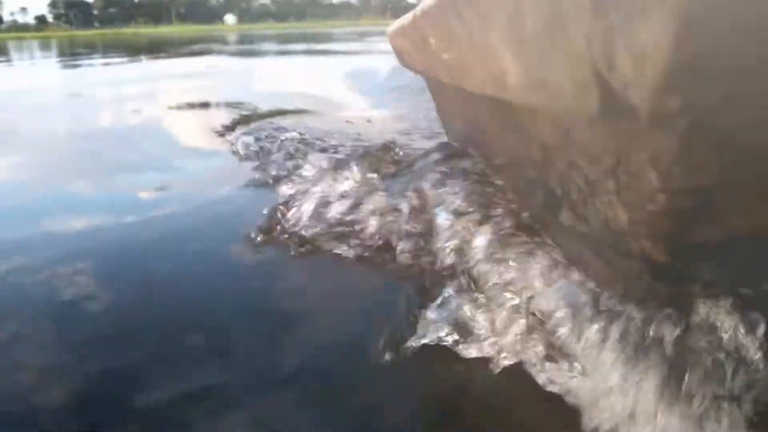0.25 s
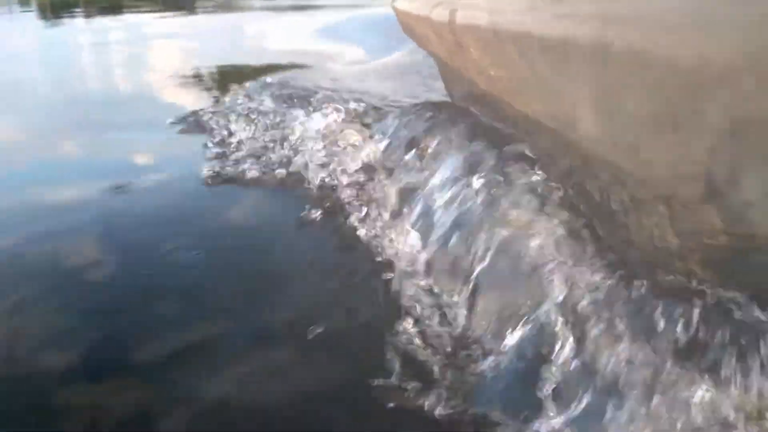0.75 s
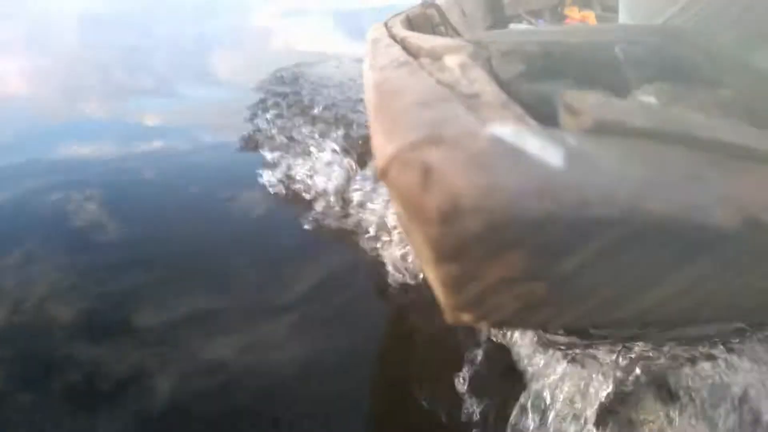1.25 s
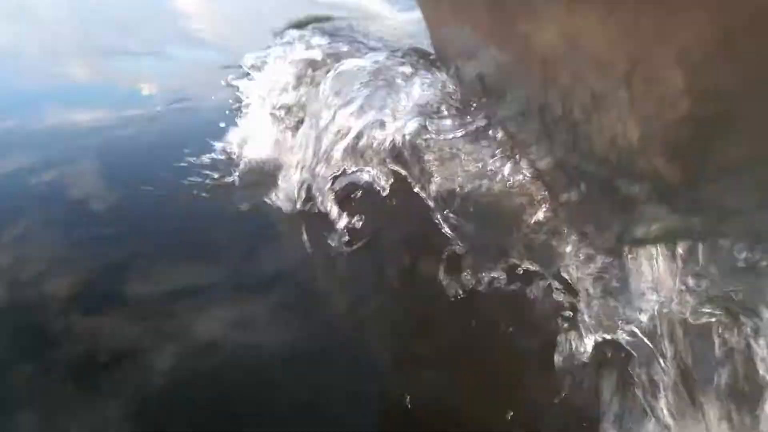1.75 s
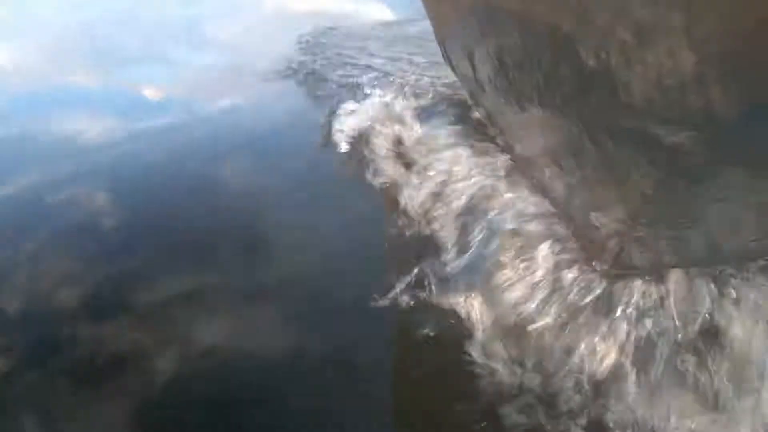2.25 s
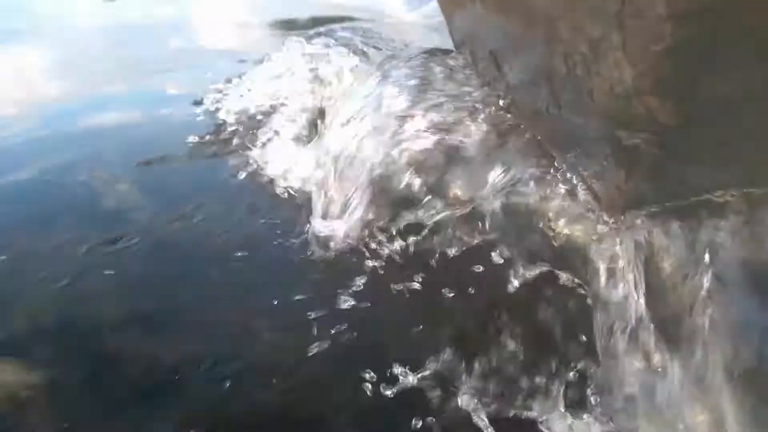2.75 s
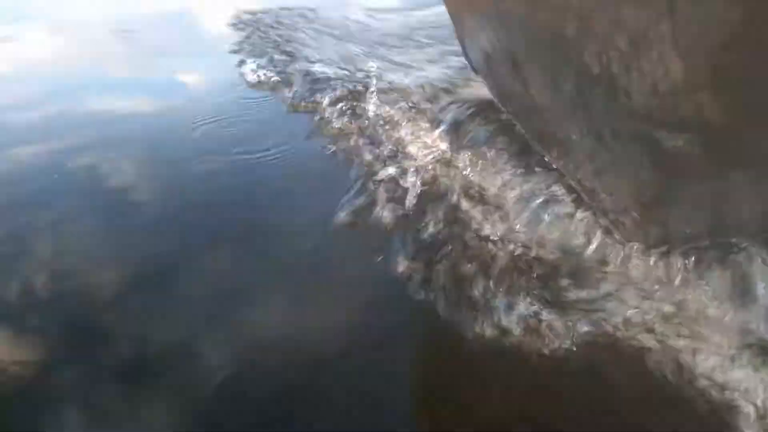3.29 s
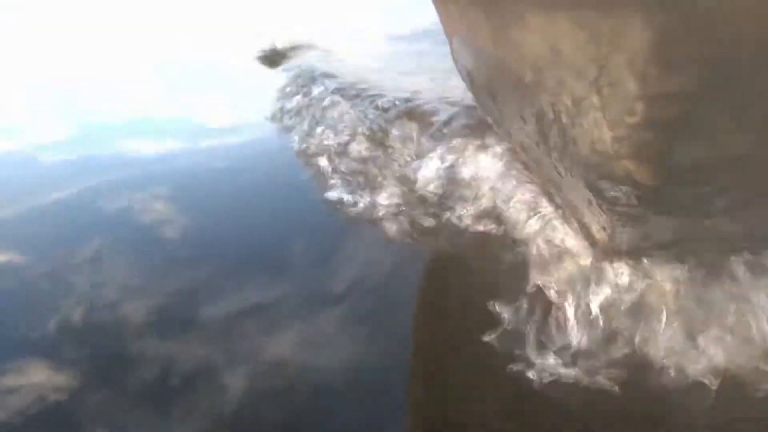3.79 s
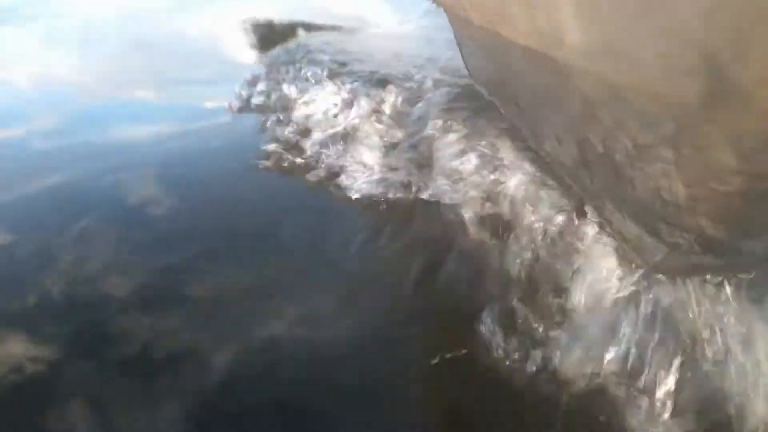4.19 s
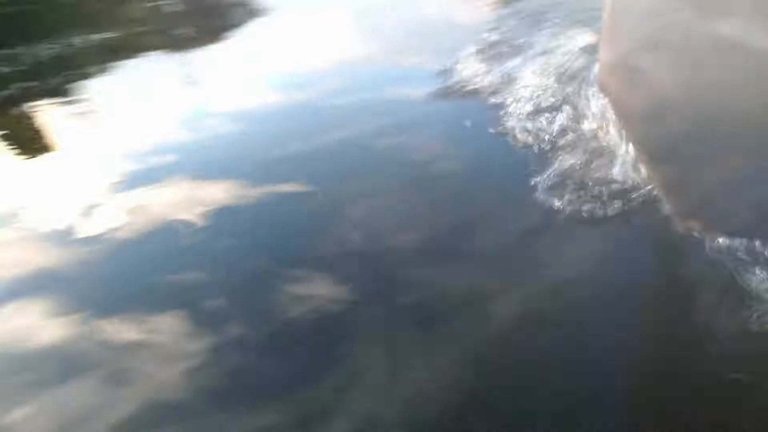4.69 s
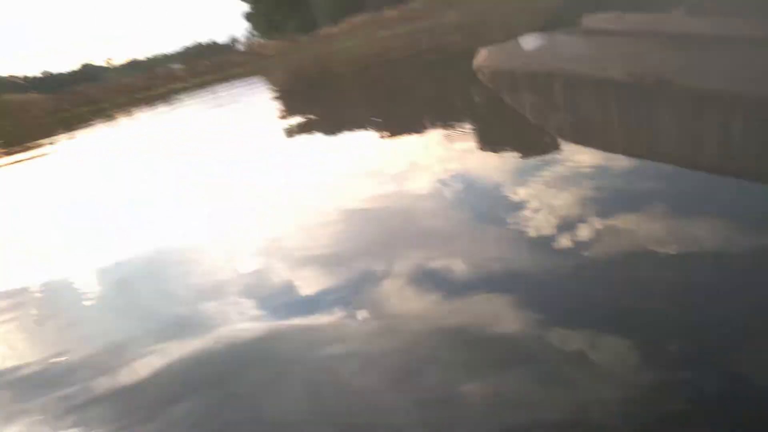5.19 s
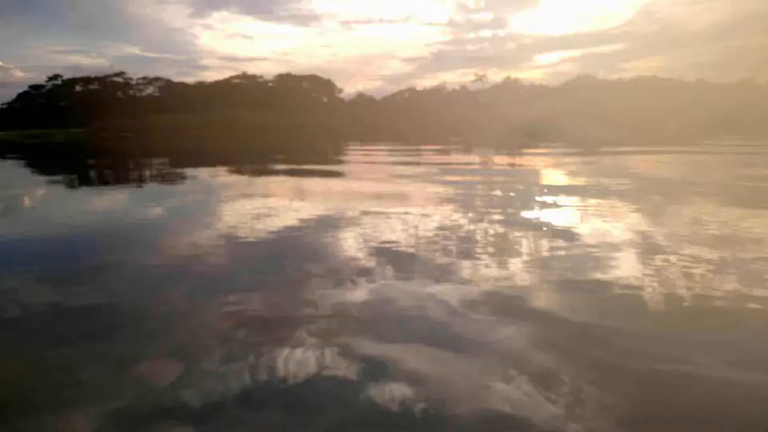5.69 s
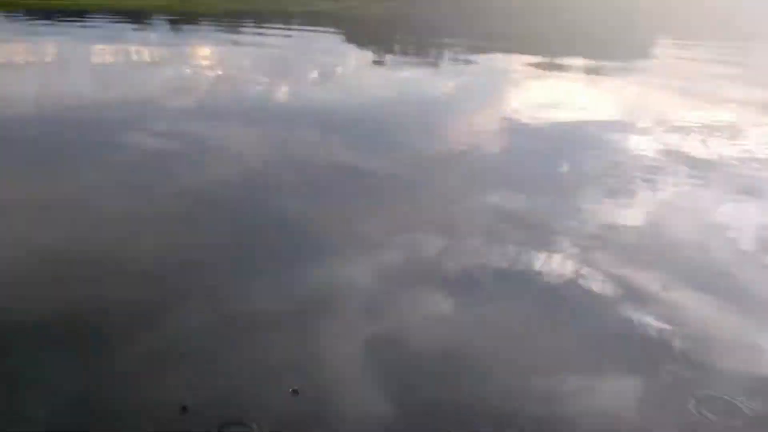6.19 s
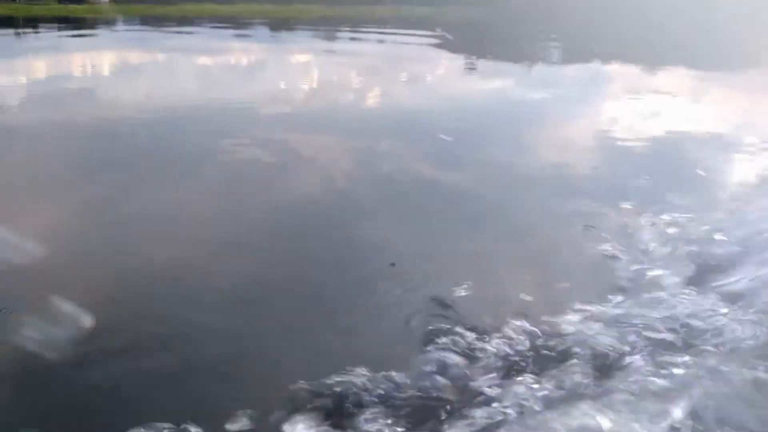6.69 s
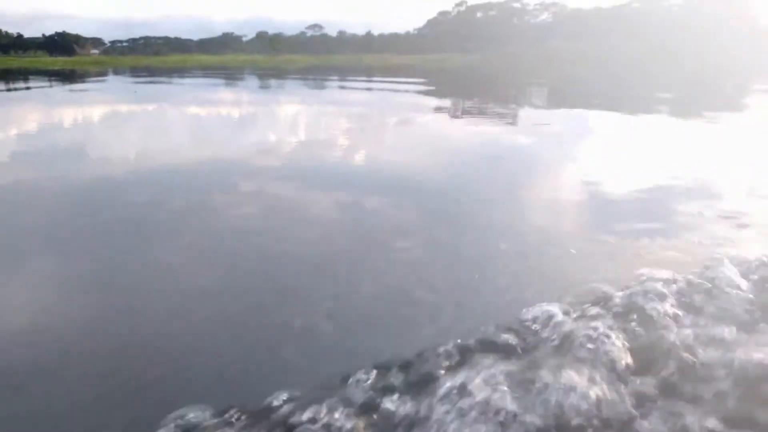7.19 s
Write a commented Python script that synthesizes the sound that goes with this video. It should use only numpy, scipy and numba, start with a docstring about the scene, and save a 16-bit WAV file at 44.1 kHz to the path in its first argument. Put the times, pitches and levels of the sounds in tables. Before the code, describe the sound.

Water gurgles, gulps and splashes in uneven surges beside a small moving boat, then bursts into loud crackling spray with low wind buffeting close up.

```python
"""Beside the hull of a small moving boat, its bow wave breaks in uneven surges close to a hand-held phone.
Trapped air rings as bubbles, decaying sines: big pockets gurgle and gulp, smaller ones plop and fizz.
Spray crackles on top as coloured impacts, noise and microbubbles; near drops click as bursts of noise.
Gusts of the boat's own wind, made of low coloured noise and single thumps, buffet the two microphone ports."""
import sys
import numpy as np
from scipy import signal
from scipy.fft import rfft, irfft, next_fast_len
from scipy.io import wavfile
from scipy.ndimage import uniform_filter1d, minimum_filter1d
from numba import njit

SR = 44100
rng = np.random.default_rng(int(sys.argv[2]) if len(sys.argv) > 2 else 0)


def waveform_to_disk(signal):
    """Save audio, clipped to [-1, 1], as 16-bit WAV at the path in sys.argv[1]."""
    frames = np.transpose(np.atleast_2d(signal))
    scaled = np.clip(frames, -1, 1) * 32767
    samples = np.round(scaled).astype(np.int16)
    wavfile.write(sys.argv[1], SR, samples)


N = 328532

# ring of the foam: (time [s], central bubble pitch [Hz], treble gain [dB])
FOAM_RING = [(0.0, 2313, -2), (0.5, 2380, -10.5), (0.9, 2103, -2), (1.5, 1904, 0.5), (2.1, 1441, 9.5),
             (2.6, 1594, 12), (2.9, 1406, 9.5), (3.45, 1610, 16.5), (3.6, 2516, -5), (4.0, 2398, -5),
             (4.3, 2295, -6), (4.8, 1956, -7), (5.2, 1810, -15), (5.6, 1945, -5), (5.9, 1795, 1),
             (6.2, 1905, -15), (6.5, 1520, -2), (6.65, 1610, 10), (6.85, 1801, -2), (7.05, 1903, 6.5),
             (7.45, 1817, -11)]

SLOPE_DB = 23  # a rise or fade time covers this many dB
# factors on the surges' rise and fade times, which the spray takes unchanged
FOAM_RISE, FOAM_FADE = 1.73, 1.32
MIST_RISE, MIST_FADE = 1.64, 0.88
GURGLE_RISE, GURGLE_FADE = 1.2, 0.76
# the hull ripples on between surges: levels ahead of each layer's trim
RIPPLE_SPRAY_DB, RIPPLE_MIST_DB, RIPPLE_FOAM_DB, RIPPLE_GURGLE_DB = -42.5, -74, -57.5, -72
PING_HZ, PING_DRIFT = 9015, 0.052  # usual pitch of the spray's microbubbles; random drift [octaves]
CURL_RISE_S, CURL_FADE_S = 0.045, 0.068
PLOP_DB, PLOP_GROWTH, PLOP_HZ = -25.5, 0.56, 812  # plops outside curls; growth in dB per dB of foam
GUST_RISE_S, GUST_FADE_S, BREEZE_DB = 0.11, 0.27, -53  # the breeze blows on between gusts
FOAM_TREBLE_HZ = 2960  # where the foam's treble begins
BLEND_ABOVE_HZ = 4450  # below this the ports' spray stays separate
TOP_HZ = 15600  # upper edge of the phone's passband


def undb(db):
    """Logarithmic level: decibels to amplitude gain."""
    return 10 ** (np.asarray(db) / 20)


def curve(table, axis=1):
    """Linear interpolation of one column of a table at every sample."""
    rows = np.array(table)
    return np.interp(np.arange(N) / SR, rows[:, 0], rows[:, axis])


def pan(db):
    """Level difference between the ports: left and right gains whose mean is 1."""
    gains = undb(np.array([db, -db]) / 2)
    return gains / gains.mean(axis=0)


def colour(x, points):
    """Minimum-phase filter: the folded cepstrum of the (Hz, dB) outline gives a causal response."""
    size = next_fast_len(x.shape[-1] + 8192, True) * 2
    hz, db = np.transpose(points)
    freqs = np.maximum(np.fft.rfftfreq(size, 1 / SR), 1)
    outline_db = np.interp(np.log(freqs), np.log(hz), db)
    cepstrum = irfft(np.log(undb(outline_db)))
    cepstrum[1:size // 2] *= 2
    cepstrum[size // 2 + 1:] = 0
    response = np.exp(rfft(cepstrum))
    return irfft(rfft(x, size) * response)[..., :x.shape[-1]]


def steady(x, span_s):
    """Power normalisation: the mean of the ports is levelled over each span; faster grain is kept."""
    power = x.mean(axis=0) ** 2
    width = max(int(span_s * SR), 1)
    slow = uniform_filter1d(uniform_filter1d(power, width), width)
    return x / np.sqrt(np.abs(slow) + power.mean() / 1000)


def walk(rate):
    """Band-limited fluctuation: random levels held 1 / rate s and slewed, of unit standard deviation."""
    hold = max(int(SR / rate), 1)
    levels = rng.standard_normal(8192)
    steps = levels[np.arange(N) // hold % len(levels)]
    x = uniform_filter1d(steps, hold)
    return x / x.std()


def swell(start, rise_s, hold_s, fade_s):
    """Exponential growth and decay: gain that rises to 1 at the start, holds, then dies away."""
    t = np.arange(N) / SR - start
    before = np.maximum(-t, 0) / max(rise_s, .01)
    after = np.maximum(t - hold_s, 0) / max(fade_s, .01)
    return undb(-SLOPE_DB * np.minimum(before + after, 10))


def surging(axis, base_db, rise=1, fade=1):
    """Incoherent sum: the surges' powers add; side and pocket pitch are power-weighted means."""
    # each breaking of the bow wave: (time at full strength [s], rise [s], hold [s], fade [s],
    # spray level [dB], mist level [dB], foam level [dB], gurgle level [dB],
    # spray left minus right [dB], pitch of trapped air pockets [Hz]); levels precede each layer's trim
    breakings = [(0.0, 0.094, 0.0081, 0.42, -33, -43.5, -35, -32, 2, 330),
                 (0.295, 0.12, 0.086, 0.12, -35, -42.5, -32, -38.5, 6, 373),
                 (0.437, 0.066, 0.14, 0.24, -20.5, -33, -28.5, -27, 7, 334),
                 (0.775, 0.016, 0.063, 0.37, -33, -67, -42, -31, -0.5, 434),
                 (1.177, 0.35, 0.22, 0.42, -35.5, -49, -40, -38, -1, 403),
                 (1.434, 0.11, 0.011, 0.065, -24, -51, -43, -26, 4, 363),
                 (1.577, 0.24, 0.24, 0.42, -17, -47, -35, -23, 6, 330),
                 (1.873, 0.032, 0.0079, 0.4, -26, -54, -28, -18, -22, 372),
                 (2.27, 0.12, 0.093, 0.64, -26.5, -63, -43.5, -25.5, 4, 326),
                 (2.52, 0.13, 0.23, 0.25, -28, -40.5, -39, -29, 0.5, 306),
                 (2.908, 0.22, 0.055, 0.17, -26, -41, -33.5, -32, 1.5, 378),
                 (3.073, 0.22, 0.11, 0.47, -33, -59, -44.5, -39, 0, 337),
                 (3.63, 0.074, 0.014, 0.29, -36, -64, -39.5, -65, 9, 460),
                 (3.892, 0.16, 0.071, 0.15, -22.5, -54, -32.5, -32.5, 7, 412),
                 (4.028, 0.12, 0.13, 0.34, -23.5, -37, -32, -30.5, 1.5, 471),
                 (4.248, 0.026, 0.064, 0.085, -38, -50, -35.5, -38, 10, 452),
                 (4.365, 0.07, 0.2, 0.058, -27.5, -45, -36.5, -32.5, 1.5, 436),
                 (4.589, 0.18, 0.068, 0.072, -37, -37, -32.5, -29.5, 2, 419),
                 (4.665, 0.025, 0.25, 0.34, -23, -53, -28.5, -31, 13.5, 448),
                 (5.086, 0.2, 0.19, .2, -28, -41.5, -56, -32, 19, 380),
                 (5.322, 0.049, 0.16, 0.21, -19.5, -62, -31, -28.5, 20, 376),
                 (5.454, 0.1, 0.21, 0.5, -14.5, -23, -26.5, -24, 3.5, 292),
                 (5.738, 0.2, 0.18, 0.2, -8.5, -24, -17, -26, -2, 268),
                 (5.955, 0.19, 0.21, 0.22, -11, -22, -23, -26, 1, 273),
                 (6.299, 0.037, 0.088, 0.28, -15, -28, -53, -27, 7.5, 286),
                 (6.415, 0.059, 0.16, 0.35, -15, -25, -24.5, -32.5, -1.5, 354),
                 (6.71, 0.059, 0.016, 0.53, -20.5, -29.5, -29.5, -27.5, -2.5, 290),
                 (7.144, 0.017, 0.023, 0.13, -17.5, -33, -56, -35.5, 7, 433)]
    power, side, pitch = 0, 0, 0
    for row in breakings:
        start, rise_s, hold_s, fade_s, *_, side_db, pocket_hz = row
        envelope = swell(start, rise_s * rise, hold_s, fade_s * fade)
        part = (undb(row[axis]) * envelope) ** 2
        power = power + part
        side = side + part * side_db
        pitch = pitch + part * pocket_hz
    level_db = 10 * np.log10(power + undb(base_db) ** 2)
    return level_db, side / power, pitch / power


@njit
def ring(start, hz, onset, cycles, rise, size, lag):
    """Damped oscillators: bubbles swell over `onset` cycles, fall to 1 / e in `cycles`, climb near the surface."""
    out = np.zeros(N)
    for k in range(len(start)):
        first = (start[k] + lag[k]) * SR
        last = min(int(first + 6 * cycles[k] * SR / hz[k]), N)
        for i in range(max(int(first) + 1, 0), last):
            turns = (i - first) * hz[k] / SR
            age = turns / cycles[k]
            envelope = (1 - np.exp(-(turns / onset[k]) ** 2)) * np.exp(-age)
            out[i] += size[k] * envelope * np.sin(2 * np.pi * turns * (1 + rise[k] * age / 8))
    return out


def cloud(pitch_hz, spread, onset, cycles, rise, scatter_db, side_db, width_db, lag_ms, lag_spread_ms, count):
    """Superposed bubbles around a pitch (spread in octaves), each with its own lag and balance at the ports."""
    start = (np.arange(count) + rng.random(count)) / count * N / SR
    tone, life, climb, loud, place, path, sign = rng.standard_normal((count, 7)).T
    centre_hz = np.broadcast_to(pitch_hz, N)[(start * SR).astype(int)]
    hz = centre_hz * 2 ** (spread * np.clip(tone, -2, 2))
    size = np.sign(sign) * undb(scatter_db * np.clip(loud, -2.5, 2.5))
    onsets = np.full(count, float(onset))
    lives = max(cycles, .5) * np.exp(0.31 * life)
    climbs = rise * (1 + climb)
    lag = (lag_ms + lag_spread_ms * path) / 1000  # of the right port behind the left
    gains = pan(side_db + width_db * place)
    return np.array([ring(start, hz, onsets, lives, climbs, size * gains[c], c * lag) for c in range(2)])


def gurgle():
    """Volume resonance of large air pockets, which throb under the folding wave."""
    gurgle_db, _, pocket_hz = surging(axis=7, base_db=RIPPLE_GURGLE_DB, rise=GURGLE_RISE, fade=GURGLE_FADE)
    pockets = cloud(pocket_hz, spread=0.241, onset=1.67, cycles=3.28, rise=0.128, scatter_db=4.5,
                    side_db=1.0, width_db=6.5, lag_ms=0.077, lag_spread_ms=0.098, count=1000)
    return steady(pockets, span_s=.04) * undb(gurgle_db - 3.0 + 2.5 * walk(25))


def plops(foam_db):
    """Bubble resonance at middle sizes: the crest falls back on the water and sheds bunches of like size."""
    # curls of water that fall back: (time [s], hold [s], level ahead of trim [dB], mean pitch [Hz])
    curls = [(0.11, 0.059, -40, 664), (1.61, 0.31, -35, 715), (1.92, 0.13, -37, 1130),
             (2.028, 0.14, -37, 1220), (2.308, 0.052, -38.5, 880), (2.513, 0.12, -33, 580),
             (2.792, 0.046, -29.5, 944), (2.874, 0.048, -33, 620), (2.893, 0.18, -36.5, 1200),
             (3.08, 0.034, -32.5, 580), (3.143, 0.2, -45, 905), (3.435, 0.029, -37.5, 1050),
             (3.646, 0.14, -45.5, 780), (3.909, 0.12, -37, 1120), (4.375, 0.22, -42, 720),
             (5.884, 0.061, -29, 920), (6.404, 0.22, -30, 1434), (6.548, 0.05, -28, 650),
             (6.66, 0.17, -30, 626), (6.85, 0.1, -36.5, 1073), (6.896, 0.29, -39, 665),
             (7.2, 0.3, -47.5, 764)]
    power = undb(PLOP_DB + PLOP_GROWTH * foam_db) ** 2
    pitch = power * PLOP_HZ
    for start, hold_s, db, hz in curls:
        part = (undb(db) * swell(start, CURL_RISE_S, hold_s, CURL_FADE_S)) ** 2
        power = power + part
        pitch = pitch + part * hz
    bunches_hz = pitch / power * 2 ** (0.15 * walk(30))
    bubbles = cloud(bunches_hz, spread=0.38, onset=1.8, cycles=1.8, rise=0.04, scatter_db=2.8,
                    side_db=3.5, width_db=6.0, lag_ms=0.1, lag_spread_ms=0.3, count=5000)
    return steady(bubbles, span_s=0.057) * np.sqrt(power) * undb(-2.0 + 2.7 * walk(28))


def roar(centre_hz, width_hz):
    """Amplitude modulation: noise on a moving carrier, like countless bubbles merged into one band."""
    lowpass = signal.butter(3, width_hz / 2, fs=SR, output="sos")
    body = signal.sosfilt(lowpass, rng.standard_normal((2, N)))
    return body * np.cos(2 * np.pi * np.cumsum(centre_hz) / SR)


def foam_treble(x):
    """Spectral tilt: raises or lowers the smallest bubbles against the rest of the foam."""
    lowpass = signal.butter(4, FOAM_TREBLE_HZ, fs=SR, output="sos")
    body = signal.sosfiltfilt(lowpass, x)
    return body + (x - body) * undb(curve(FOAM_RING, axis=2))


def fizz(foam_db):
    """Resonance of small foam bubbles, merging into a roar at the same pitch as the crest tumbles harder."""
    # colour of the fizzing foam: (frequency [Hz], gain [dB])
    foam_colour = [(700, -19), (1200, -2), (1600, 0), (2000, -1), (2750, 1.5), (3200, 4), (3900, 10),
                   (5000, 17), (7000, -30)]
    clusters_hz = curve(FOAM_RING) * 2 ** (0.17 * walk(22))
    bubbles = cloud(clusters_hz, spread=0.42, onset=3.0, cycles=5.5, rise=0.08, scatter_db=4.2,
                    side_db=-2.5, width_db=4.0, lag_ms=0.2, lag_spread_ms=0.25, count=6000)
    wash = roar(clusters_hz, width_hz=2000) * pan(7.3)[:, None]
    tumbling = np.clip((foam_db + 72.5) / 55, .15, .6)  # share of the power that is roar
    foam = np.sqrt(1 - tumbling) * steady(colour(bubbles, foam_colour), span_s=0.11)
    foam = foam + np.sqrt(tumbling) * steady(colour(wash, foam_colour), span_s=0.99)
    return foam_treble(foam) * undb(1.66 * walk(45) + foam_db - 3.0)


def strays(foam_db, level_db=-18, growth=0.67):
    """Resonance of lone bubbles that stand out of the wash at random, louder where there is more foam."""
    bubbles = cloud(1400, spread=0.5, onset=2.2, cycles=3.0, rise=0.06, scatter_db=1.5,
                    side_db=2, width_db=6, lag_ms=0.4, lag_spread_ms=0.25, count=300)
    return bubbles * undb(level_db + growth * foam_db)


def patter(scatter_db, count):
    """Impulsive excitation: droplet impacts of random sign and size, separate at each port."""
    out = np.zeros((2, N))
    for c in range(2):
        loud, sign = rng.standard_normal((count, 2)).T
        size = np.sign(sign) * undb(scatter_db * np.minimum(loud, 3))
        np.add.at(out[c], rng.integers(0, N, count), size)
    return out


def blended(x):
    """Channel coherence: the phone's stereo processing blends the ports' treble by a varying share."""
    # blending of the two ports: (time [s], share [0-1])
    blend_share = [(0.0, 0), (0.6, 0.7), (1.3, 0.35), (2.4, 0.84), (2.7, 0.8), (3.5, 0.54), (4.1, 0.47),
                   (5.25, 0), (5.55, 0.92), (6.7, 0.94), (7.2, 1)]
    highpass = signal.butter(10, BLEND_ABOVE_HZ, "high", fs=SR, output="sos")
    treble = signal.sosfiltfilt(highpass, x)
    return x + np.clip(curve(blend_share), 0, 1) * (treble.mean(axis=0) - treble)


def spray():
    """Impact noise and bubble resonance: sheets burst in spurts into droplets, pinging microbubbles and mist."""
    # spray at the port, whose cavity rings near 9 kHz: (frequency [Hz], gain [dB])
    spray_colour = [(2500, -18.5), (3900, -17.5), (4500, -12), (5300, -9), (7200, -7.5), (8400, -13.5),
                    (9350, 6), (10200, -12), (11500, -12), (12600, -17.5), (16000, -26)]
    # colour of the finest mist: (frequency [Hz], gain [dB])
    mist_colour = [(3000, -13.5), (6000, -1), (11500, -11.5), (16000, -4)]
    # how fine the spray is: (time [s], shift of microbubble pitch [octaves])
    fineness = [(0.0, 0.038), (0.45, -0.054), (0.9, -0.0097), (1.6, -0.0067), (1.92, -0.11), (2.25, 0.07),
                (2.45, 0.1), (2.58, -0.043), (3.9, 0.0042), (4.5, 0.14), (5.0, -0.051), (5.65, -0.02),
                (6.0, 0.061), (6.3, -0.17), (6.76, 0.13), (7.45, -0.045)]
    spray_db, side_db, _ = surging(axis=4, base_db=RIPPLE_SPRAY_DB)
    mist_db, _, _ = surging(axis=5, base_db=RIPPLE_MIST_DB, rise=MIST_RISE, fade=MIST_FADE)
    spurts = undb(1.62 * walk(60) + 1.48 * walk(450))
    impacts = steady(patter(scatter_db=1.0, count=45000), span_s=0.19)
    ping_hz = PING_HZ * 2 ** (curve(fineness) + PING_DRIFT * walk(5))
    pings = cloud(ping_hz, spread=0.11, onset=1.8, cycles=4.2, rise=0.035, scatter_db=6.5,
                  side_db=7, width_db=18, lag_ms=0, lag_spread_ms=0.044, count=14000)
    hiss = undb(-8.0) * rng.standard_normal((2, N))
    crackle = steady(colour(impacts + hiss, spray_colour), span_s=0.074)
    crackle = crackle + undb(-0.5) * steady(pings, span_s=0.07)
    droplets = cloud(10200, spread=0.46, onset=0.59, cycles=3.5, rise=0.017, scatter_db=2,
                     side_db=5.5, width_db=25, lag_ms=0, lag_spread_ms=0.203, count=24000)
    mist = colour(droplets, mist_colour)
    burst = steady(blended(crackle) * spurts, span_s=0.54) * undb(spray_db - 2.3)
    haze = steady(blended(mist) * spurts, span_s=0.078) * undb(mist_db + 3.0)
    return (burst + haze) * pan(side_db)


def wind(calm_flutter=0.05):
    """Turbulent pressure: eddies buffet each port separately; strong gusts flutter most at the left one."""
    # gusts on the ports: (time [s], hold [s], level ahead of trim [dB])
    gust_rows = [(0.172, 0.5, -31), (0.84, 0.011, -36), (1.087, 0.035, -38), (1.405, 0.19, -39),
                 (1.864, 0.18, -39), (3.76, 0.091, -57), (4.317, 0.025, -51), (4.735, 0.018, -32),
                 (4.878, 0.41, -36.5), (5.14, 0.13, -30), (5.381, 0.25, -20.5), (5.718, 0.18, -27),
                 (6.217, 0.24, -31), (6.9, 0.11, -36.5), (7.196, 0.1, -34.5)]
    # colour of the buffeting: (frequency [Hz], gain [dB])
    eddy_colour = [(15, -18), (30, -15), (55, 11), (80, 8), (110, 0), (170, -4), (300, -17.5), (700, -23.5),
                   (2500, -91)]
    # flutter that strong gusts tear off the edge of the left port: (frequency [Hz], gain [dB])
    flutter_colour = [(40, -34), (100, 3), (165, 3), (240, -2), (400, -16), (560, -37), (900, -72),
                      (2500, -59)]
    gusts = sum((undb(db) * swell(start, GUST_RISE_S, hold_s, GUST_FADE_S)) ** 2
                for start, hold_s, db in gust_rows)
    breeze = undb(BREEZE_DB + 2 * walk(11)) ** 2
    gust_db = 10 * np.log10(gusts + breeze)
    eddies = colour(rng.standard_normal((2, N)), eddy_colour) * pan(8.6)[:, None]
    flutter = colour(rng.standard_normal((2, N)), flutter_colour) * pan(47)[:, None]
    strong = np.clip((gust_db + 43.5) / 22, calm_flutter, 1)
    air = steady(eddies, span_s=0.1) + undb(4.0) * strong * steady(flutter, span_s=0.41)
    return steady(air * undb(4.2 * walk(35)), span_s=0.12) * undb(gust_db - 0.5)


def gulps(onset=1.32, cycles=2.91, rise=0.078, lag_ms=0.25, shard_db=-9, shard_octaves=0.32,
          shard_s=.004, count=5):
    """Resonance at pinch-off: a loud pocket tears into a main bubble and weaker shards of other sizes."""
    # single loud bubbles: (time [s], level before the envelope [dB], pitch of the main bubble [Hz])
    pinches = [(0.048, -17.5, 580), (0.097, -9, 303), (0.124, -24, 1350), (0.14, -18.5, 573),
               (0.14, -18, 980), (0.152, -27, 790), (0.192, -21, 654), (0.36, -13, 423), (0.362, -18, 920),
               (0.383, -15, 2130), (0.398, -19, 1700), (0.454, -18, 313), (0.59, -11, 376),
               (0.662, -14.5, 351), (0.845, -21, 521), (0.874, -12, 497), (0.877, -26, 884),
               (0.883, -19.5, 417), (1.107, -22.5, 1700), (1.154, -20, 1420), (1.185, -29, 1850),
               (1.27, -21, 2280), (1.298, -22, 2520), (1.324, -18.5, 2540), (1.344, -13.5, 516),
               (1.372, -17, 466), (1.419, -22, 930), (1.582, -17.5, 1370), (1.602, -15, 303),
               (1.679, -7.5, 295), (1.692, -15, 740), (1.743, -11.5, 400), (1.839, -8, 349),
               (1.863, -17, 1440), (1.885, -13, 340), (1.884, -12, 1281), (1.977, -2.5, 351),
               (1.986, -1.5, 328), (2.003, -8, 305), (2.018, -37, 1280), (2.035, -12, 910),
               (2.064, -19, 1615), (2.139, -19, 1410), (2.142, -16.5, 836), (2.195, -21, 1630),
               (2.285, -13.5, 310), (2.323, -19, 1010), (2.356, -24, 1060), (2.428, -25, 1350),
               (2.555, -18, 320), (2.6, -23, 330), (2.675, -12, 288), (2.728, -16.5, 281.6),
               (2.798, -23, 930), (2.823, -11.5, 793), (2.874, -33, 556), (2.896, -16, 480),
               (2.945, -17.5, 317), (2.953, -12, 1250), (3.015, -9, 1365), (3.022, -20, 296),
               (3.031, -15, 1470), (3.062, -11.5, 280), (3.082, -16, 450), (3.094, -15.5, 586),
               (3.158, -24, 520), (3.175, -24, 430), (3.27, -22, 920), (3.362, -26.5, 758),
               (3.434, -23.5, 1190), (3.601, -19.5, 3150), (3.641, -23, 3050), (3.646, -31, 562),
               (3.688, -32, 593), (3.709, -27.5, 1322), (3.738, -27, 610), (3.807, -13, 433),
               (3.853, -20.5, 440), (3.889, -14.5, 2965), (3.92, -23, 435), (3.962, -10.5, 3200),
               (4.013, -20, 493), (4.034, -19, 1290), (4.122, -18, 560), (4.165, -23, 496),
               (4.258, -19, 451), (4.414, -18, 432), (4.384, -21.5, 950), (4.45, -14, 426),
               (4.453, -23, 905), (4.538, -12, 294), (4.782, -14, 1060), (5.01, -9.5, 319),
               (5.063, -17, 743), (5.295, -11.5, 390), (5.484, -9, 1910), (5.515, -9, 1960),
               (5.585, -6.5, 289), (5.708, -5.5, 282), (5.765, -5.5, 280), (5.885, -11.5, 286),
               (5.91, -0.5, 1850), (6.168, -10.5, 290.7), (6.252, -15.5, 905), (6.392, -13.5, 267),
               (6.418, -15, 297), (6.476, -7, 1344), (6.484, -5, 1840), (6.573, -5, 1420),
               (6.591, -4.5, 1530), (6.669, -14, 624), (6.738, -14.5, 256), (6.776, -12.5, 860),
               (6.807, -22, 500), (6.841, -24, 694), (7.045, -19, 358), (7.122, -17, 454),
               (7.385, -28, 480)]
    start, db, hz = np.transpose(pinches).astype(float)
    late, tone = rng.standard_normal((len(pinches), 2, count)).transpose(1, 0, 2)
    shard = np.arange(count) > 0  # the first of each group is the main bubble
    start = (start[:, None] + shard * shard_s * (.5 + late)).ravel()
    # about half the shards are somewhat larger and lower, half smaller and up to much higher
    hz = (hz[:, None] * 2 ** (shard * shard_octaves * np.clip(tone, -.5, 2))).ravel()
    size = undb(db[:, None] + shard * shard_db).ravel()
    longer = (hz / 350) ** 0.28  # small bubbles swell and ring over more cycles
    lag = lag_ms / 1000 * np.minimum(1, 600 / hz)
    climb = np.full(len(start), rise)
    return np.array([ring(start, hz, onset * longer, cycles * longer, climb, size, c * lag)
                     for c in range(2)])


def thumps(pitch_hz=85, cycles=0.65, side_db=6):
    """Heavily damped oscillation: a lone eddy shoves the air in the port back and forth once or twice."""
    # single eddies at the ports: (time [s], level before the envelope [dB])
    shoves = [(0.675, -11), (5.373, -4), (5.45, -7), (5.527, -6), (5.585, -8), (5.626, 0), (5.652, -16),
              (5.796, -8), (5.88, -11), (6.918, -4), (7.196, -8), (7.248, -9), (7.309, -10)]
    start, db = np.transpose(shoves).astype(float)
    each = np.ones(len(start))
    shove = ring(start, pitch_hz * each, 0.6 * each, cycles * each, 0 * each, undb(db), 0 * each)
    return shove * pan(side_db)[:, None]


def drops(touch_s=0.00076, burst_s=0.001, splatter_s=0.03, splatter_db=-22, width_octaves=0.11, click_db=-16):
    """Impact transient: filtered noise forms a near drop's thin click, microbubble burst and short splatter."""
    # drops that land close by: (time [s], peak level [dB], left minus right [dB], pitch [Hz])
    landings = [(1.192, -14.5, 5, 8800), (1.4065, -9, 5.5, 8850), (1.426, -19, -8, 8700),
                (1.521, -2, 32, 9700), (1.675, 4, 30, 9600), (2.2655, -13, 19, 9800),
                (2.3123, -7, 18, 10200), (2.4208, -6.5, 42, 9800), (2.8963, -15, 16, 9440),
                (3.6014, -19.5, -3, 8700), (3.6446, -12, 5, 11100), (3.7428, -16.5, 11.5, 9050),
                (3.797, -10, 10, 8900), (3.863, -9, 20, 9050), (3.9, -11, 15, 9600),
                (3.9114, -9.5, 19, 9340), (3.9475, -8, 13, 9400), (4.0625, -6.5, 1, 9540),
                (4.134, -25, -1, 9800), (4.3041, -18, -4, 9700), (4.367, -7, 4, 9860),
                (4.4124, -11.5, 3, 9900), (4.437, -9, 8, 9880), (4.4787, -8.5, -9, 10060),
                (4.503, -10.5, 0, 10150), (4.6607, -10.5, 0, 9200), (4.905, -7, 25, 9220),
                (5.021, -13.5, 11, 9050), (5.3893, -2, 8, 9700), (5.4738, 8, 13, 9450),
                (6.0724, -11, 9, 9500), (6.1574, -16, 7, 9030), (6.231, -3, 1, 8800),
                (6.2997, -15, 3, 8830), (6.318, 3, -7, 9540), (6.3411, -5, 11, 9900), (6.3654, 0, 2, 9530),
                (6.3919, -2, -5, 9800), (6.4137, 2, -2, 9100), (6.457, -1, 3, 9100),
                (6.4924, -15, -1, 9420), (6.5184, 6, 1, 9300), (6.5264, -2, 0, 8900),
                (6.7635, -16, -4, 10000), (6.8376, -9, -8, 9660), (7.145, -10, 19, 9200)]
    out = np.zeros((2, N))
    t = np.arange(4096) / SR
    burst = np.exp(-t / burst_s)
    splatter = undb(splatter_db) * np.exp(-t / splatter_s)
    shape = (1 - np.exp(-t / touch_s)) * (burst + splatter)
    thin = signal.butter(2, 7000, "high", fs=SR, output="sos")
    for s, db, side_db, hz in landings:
        noise = rng.standard_normal(len(t))
        edges_hz = [hz / 2 ** width_octaves, hz * 2 ** width_octaves]
        band = signal.butter(2, edges_hz, "band", fs=SR, output="sos")
        click = undb(click_db) * signal.sosfilt(thin, noise * shape * burst)
        tick = signal.sosfilt(band, noise * shape) + click
        first = int(s * SR)
        out[:, first:first + len(t)] += tick / np.abs(tick).max() * undb(db) * pan(side_db)[:, None]
    return out


def scene(pocket_low_hz=245):
    """Superposition of water and wind in open air; the largest air pockets set the water's lowest pitch."""
    foam_db, _, _ = surging(axis=6, base_db=RIPPLE_FOAM_DB, rise=FOAM_RISE, fade=FOAM_FADE)
    highpass = signal.butter(4, pocket_low_hz, "high", fs=SR, output="sos")
    pockets = signal.sosfilt(highpass, gurgle() + gulps())
    water = pockets + plops(foam_db) + fizz(foam_db) + strays(foam_db) + spray() + drops()
    return water + wind() + thumps()


def record(dry):
    """Peak limiting and band limiting: the phone's fast limiter holds the highest peaks; the top is cut."""
    width = int(.0007 * SR)
    room = np.minimum(1, .92 / (np.abs(dry) + 1e-9))
    gain = uniform_filter1d(minimum_filter1d(room, width), width)
    lowpass = signal.ellip(10, .2, 70, TOP_HZ, fs=SR, output="sos")
    return signal.sosfilt(lowpass, dry * gain)


dry = scene()
out = record(dry)
waveform_to_disk(out)
```